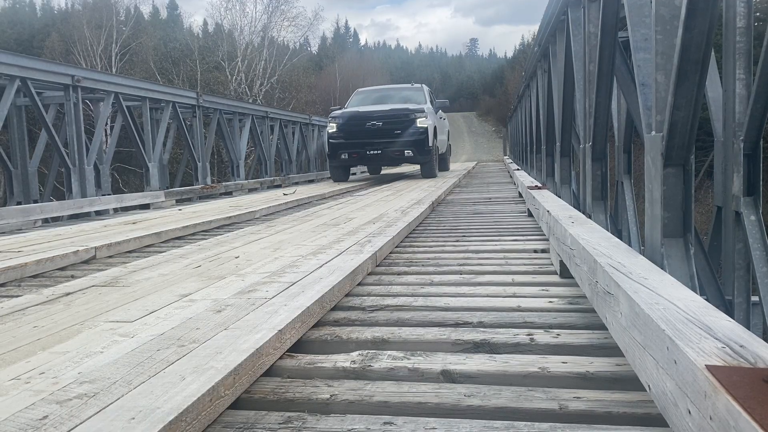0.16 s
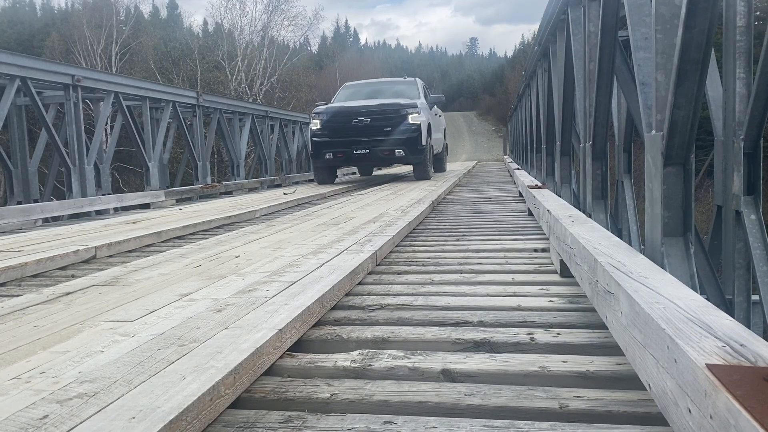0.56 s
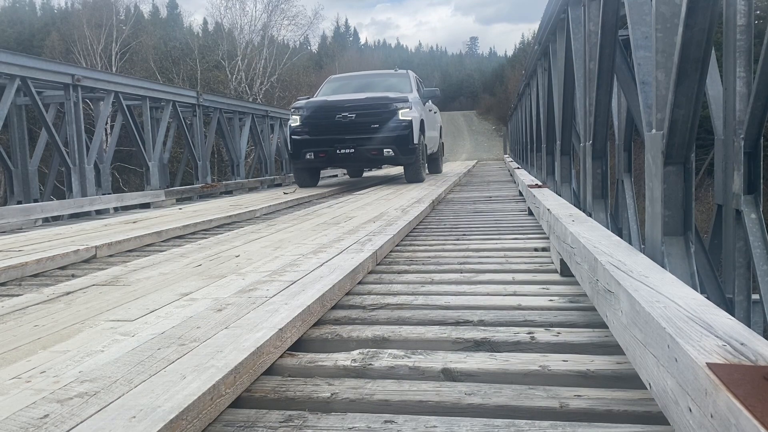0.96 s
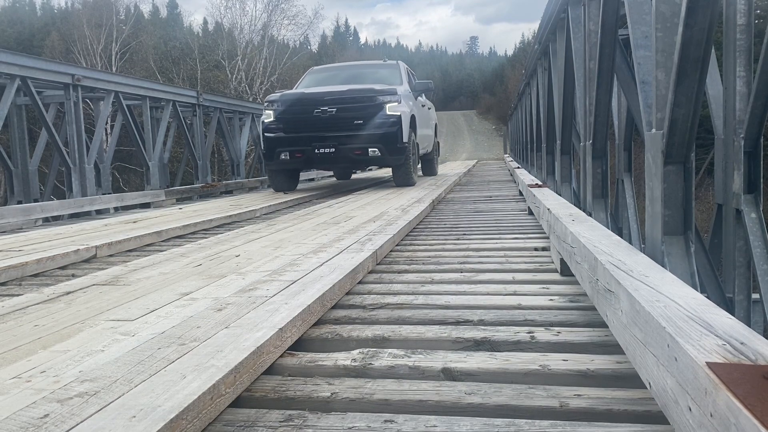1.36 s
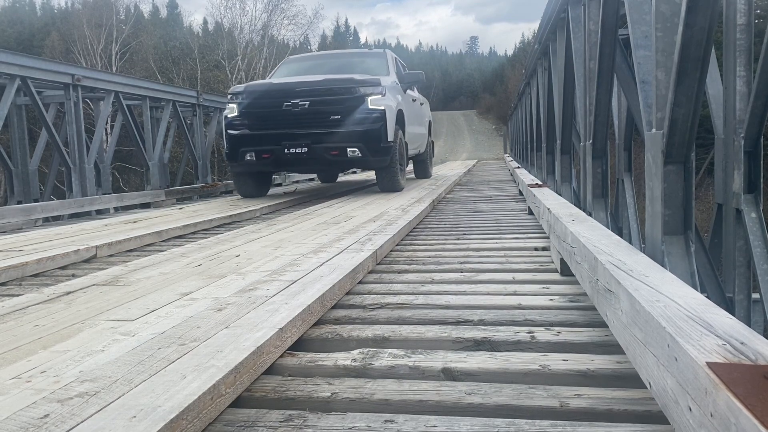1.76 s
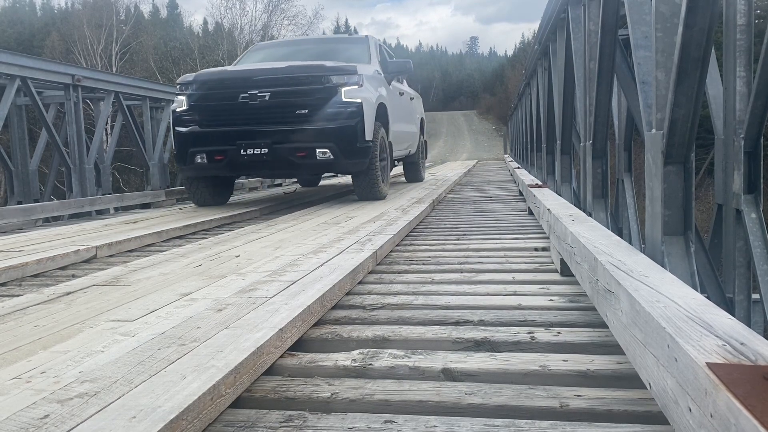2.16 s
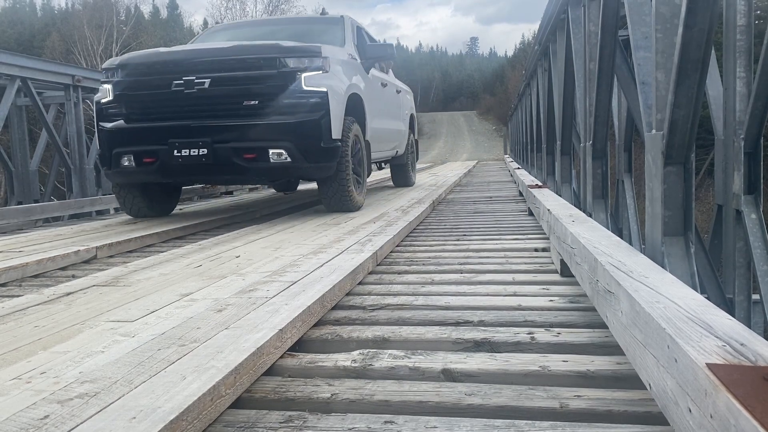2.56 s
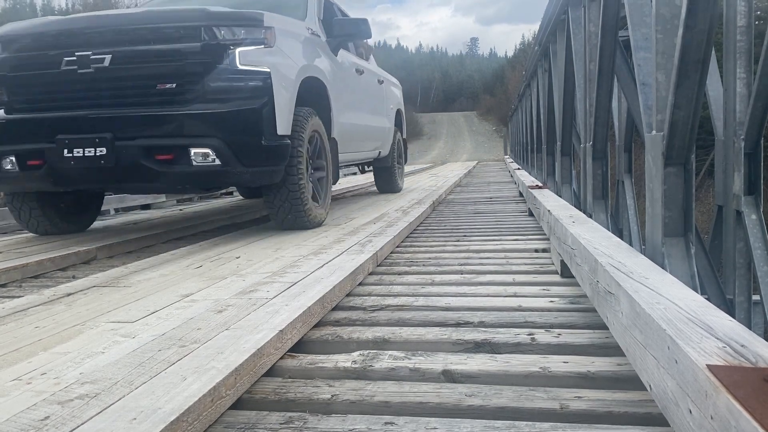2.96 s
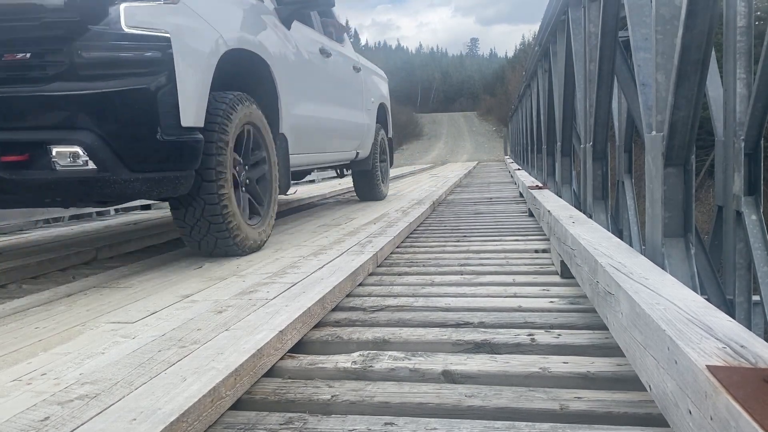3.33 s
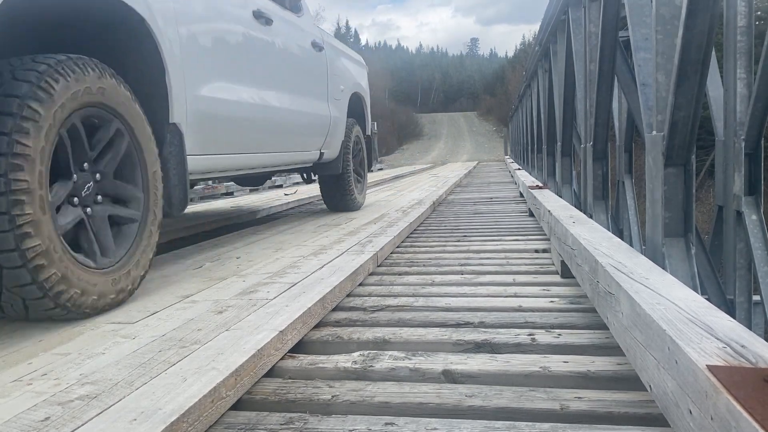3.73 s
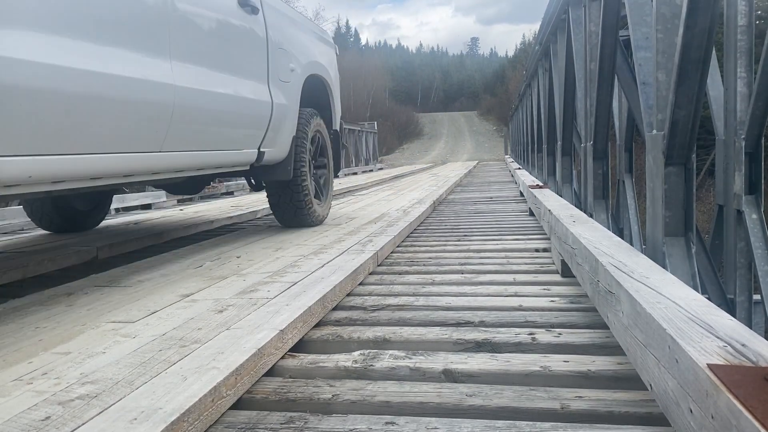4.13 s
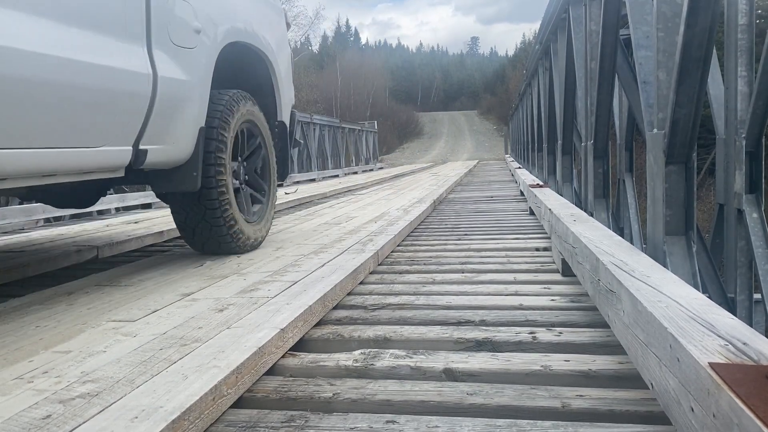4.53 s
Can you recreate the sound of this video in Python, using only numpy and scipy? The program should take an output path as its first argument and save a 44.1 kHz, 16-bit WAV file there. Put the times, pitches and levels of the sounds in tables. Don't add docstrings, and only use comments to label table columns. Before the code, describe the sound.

A pickup truck drives slowly towards a fixed stereo microphone on a steel-truss bridge with a wooden deck. At first it is quiet: low exhaust drone, soft tyre roll on wood and a faint rising whine. Around 0.7-0.9 s distant loose planks tap, one with a crisp knock, then a lull. From 1.55 s uneven slaps return, clearer at 1.9 and 2.1 s, clustered near 2.6 s, while the engine hum strengthens. A firm bang at 2.86 s leads to a heavy hollow slam at 3.12 s, then pairs near 3.4 and 3.6 s and a very hard one at 3.73 s. As the truck draws abreast, air hiss, tread noise and a steady mid-pitched driveline whine swell. More slams fall around 4.0 s, then a dense burst from 4.43 to 4.68 s. Each slap is a brief chatter, cracking clack and short woody thud, with a brief scattered tail.

```python
import sys
import numpy as np
from scipy import signal
from scipy.fft import rfft, irfft, next_fast_len
from scipy.io import wavfile

SR = 44100
rng = np.random.default_rng(int(sys.argv[2]) if len(sys.argv) > 2 else 0)


def linear_from_db(decibels):
    return 10 ** (np.asarray(decibels, float) / 20)


def log_audio(samples):
    frames = np.atleast_2d(samples).T
    limited = np.clip(frames, -1, 1)
    pcm = np.round(limited * 32767).astype(np.int16)
    wavfile.write(sys.argv[1], SR, pcm)


N = 206973

# time in seconds, pitch in Hz, level in dB.
EXHAUST_DRONE = [(0.0, 72.2, -51.5), (1.119, 75.36, -51.5), (1.16, 75.96, -40.5), (2.35, 76.1, -32.5),
                 (2.59, 76.1, -37.5), (3.03, 75.2, -33), (3.3, 76.2, -48), (3.8, 75.83, -47),
                 (4.27, 77.37, -30.5), (4.58, 79.1, -35.5), (4.69, 75, -26)]
# start in seconds, length in seconds, start pitch in Hz, end pitch in Hz, level in dB.
DRIVELINE_WHINES = [
    (-.2, 1.05, 968, 1003, -59.5),
    (1.1, .6, 1024, 1035, -62),
    (3.64, .52, 587, 584, -37),
    (4.22, .26, 588, 589, -34),
    (3.9, .36, 697, 702, -39.5),
]
# start in seconds, peak in dB, main mode in Hz.
PLANK_THUDS = [(0.75, -36.5, 438), (0.884, -25, 242), (0.915, -23, 408), (1.557, -28.5, 161),
               (1.58, -25, 199), (1.761, -26, 327), (1.79, -27, 440), (1.88, -18, 299), (2.126, -24, 196),
               (2.179, -31, 148), (2.214, -27.5, 446), (2.527, -20, 344), (2.593, -26, 192),
               (2.694, -23.5, 246), (2.858, -13.5, 254), (3.12, -5, 316), (3.386, -7.5, 293),
               (3.42, -12, 371), (3.59, -11, 229), (3.605, -13.5, 268), (3.733, -5.5, 256),
               (3.783, -18, 260), (3.926, -14, 344), (4.014, -8.5, 242.6), (4.098, -21, 151),
               (4.254, -23, 370), (4.435, -8, 206), (4.504, -12.5, 238), (4.535, -9, 184.4),
               (4.66, -11.5, 427)]
# multiple of the main mode, level in dB.
PLANK_MODES = [(0.621, -5.5), (1.004, 2), (1.43, -3), (2.1, -9.5)]
# frequency in Hz, level in dB per Hz.
RUMBLE_SPECTRUM = [(15, -46), (25, -32.5), (52, 2), (80, -3.5), (161, 0.5), (284, -7), (337, -7),
                   (450, -14), (580, -34), (990, -120)]
ROLL_SPECTRUM = [(210, -25), (350, 2.5), (410, 0), (661, 2), (909, -6), (1010, -6), (1600, -25),
                 (2080, -40), (3520, -120)]
HISS_SPECTRUM = [(1100, 2.5), (1500, 2.5), (2500, -2.5), (4500, -8), (7000, -13.5), (10000, -14),
                 (13000, -29), (15600, -4)]
SPLINTER_SPECTRUM = [(1000, -2), (1600, 5.5), (2500, -13.5), (4000, -5), (7000, -5), (11000, -12.5),
                     (16000, -21.5)]
TREAD_SPECTRUM = [(1700, -60), (2100, 1), (2800, 34), (3500, -18)]
# frequency in Hz, correlation from 0 to 1.
STEREO_LIKENESS = [(60, 1), (250, 1), (700, 0.86), (1400, 0.68), (3000, 0.55), (5200, 0.42), (6700, 0.83),
                   (16000, .995)]
# frequency in Hz, lag of the right in radians for sound from ahead,
# the same lag for sound from beside, left over right in dB for sound from beside.
MICROPHONE_PORTS = [(0, 0, 0, 0), (250, .05, .7, 1.5), (650, .15, 1.0, 7), (1150, .2, 1.3, 2),
                    (1550, .3, 3.4, 1), (2000, .5, 6.3, 3), (3300, .5, 6.9, 4), (4500, .2, 6.4, 2),
                    (6600, 0, 2 * np.pi, 0)]
# frequency in Hz, time to fall 60 dB in seconds.
TRUSS_DECAY = [(150, 0.44), (600, 0.38), (2500, 0.18), (9000, 0.12)]
# time in seconds, level in dB.
DECK_LEVEL = [(0.0, -45.5), (0.63, -46.5), (0.97, -40.5), (1.15, -44), (1.42, -44), (2.08, -38.5),
              (2.31, -41.5), (2.56, -44), (2.7, -36.5), (3.15, -38.5), (3.3, -33), (3.8, -34.5), (4.0, -33),
              (4.4, -31.5), (4.57, -26), (4.69, -30.5)]
# start in seconds, clack in dB, clack pitch in Hz, splinter in dB, chatter length in ms.
SLAPS_AHEAD = [(0.7248, -32, 1920, -61, 7.6), (0.8779, -8, 1370, -35.5, 2.17),
               (0.9095, -27, 2570, -47, 5.4), (1.138, -33, 2200, -49.5, 8.2),
               (1.5524, -38, 2700, -49.5, 4.7), (1.5815, -37, 2180, -50.5, 8.7),
               (1.6164, -32, 1790, -55, 4), (1.7586, -32, 2150, -49.5, 5.6), (1.879, -24, 1710, -39, 8.1),
               (2.1222, -24, 2260, -37, 7.4), (2.174, -27, 1870, -42.5, 15.4),
               (2.522, -36, 1803, -39.5, 11.5), (2.593, -26.5, 2100, -38, 20), (2.6125, -28, 2590, -39, 6),
               (2.6917, -32, 1750, -42.5, 7.1), (2.71, -36, 1730, -45, 4.3),
               (2.8589, -11.5, 2030, -30, 5.1)]
SLAPS_BESIDE = [(3.1192, -12.5, 3520, -21, 11.5), (3.3069, -39, 3800, -41, 10),
                (3.3792, -16, 2480, -29, 9.7), (3.4188, -15, 2340, -28.5, 11.4),
                (3.501, -47, 2400, -42, 10), (3.5756, -15.5, 3120, -34.5, 12),
                (3.5841, -15, 2326, -23.5, 5.8), (3.7308, -4, 2160, -26.5, 5.6),
                (3.779, -25, 2050, -54, 6.1), (3.927, -20.5, 2040, -48.5, 11),
                (4.0101, -22, 2026, -33.5, 6), (4.0944, -22, 2528, -39, 5.5), (4.2426, -43, 2420, -55, 7.1),
                (4.2902, -24, 1890, -40.5, 3.2), (4.436, -4, 3260, -21, 5.2), (4.4724, -23, 2350, -36.5, 5),
                (4.4997, -7.5, 2350, -24.5, 7.7), (4.532, -8.5, 2350, -24, 7.3),
                (4.5744, -16.5, 3900, -33, 5.1), (4.6501, -9, 2470, -29, 5.9),
                (4.678, -28, 3800, -41.5, 4.8)]
# start in seconds, peak in dB, lower mode in Hz.
WOOD_KNOCKS = [(0.726, -35, 507), (0.879, -14.5, 1040), (0.91, -25.5, 586), (1.555, -35.5, 587),
               (1.76, -27, 590), (1.88, -25, 593), (2.122, -26, 620), (2.173, -29, 563), (2.523, -30, 775),
               (2.595, -25.5, 527), (2.614, -29, 634), (2.693, -24, 497), (2.86, -20.5, 784),
               (3.119, -14.5, 767), (3.308, -37, 710), (3.38, -17.5, 573), (3.42, -14, 513),
               (3.508, -23.5, 560), (3.583, -12.5, 500), (3.732, -5, 768), (3.782, -16, 545),
               (3.928, -18, 580), (4.01, -9.5, 805), (4.096, -16, 533), (4.242, -40, 610),
               (4.292, -15, 616), (4.436, -5.5, 652), (4.498, -16, 700), (4.531, -11.5, 620),
               (4.651, -14, 920)]

SPEED_M_S, ABREAST_S, LANE_M = 2.4, 4.19, 1.95
REAR_AXLE_S, WHEEL_M = 4.87, 0.29
DECK_MEAN_DB = -39
BAY_S = 0.2


def rms_one(x):
    return x / np.sqrt(np.mean(x ** 2) + 1e-20)


def in_time(rows):
    seconds, *columns = np.transpose(rows)
    return [np.interp(np.arange(N) / SR, seconds, column) for column in columns]


def at_hz(points, hz):
    table_hz, values = np.array(points)[:, 0], np.array(points)[:, 1]
    return np.interp(np.log(hz), np.log(table_hz), values)


def drift(rate):
    r = np.exp(-80 * np.pi * rate / SR)
    slow = signal.lfilter([1], [1, -2 * r, r * r], rng.standard_normal(N // 40 + 2002))[2000:]
    return np.interp(np.arange(N) / 40, np.arange(len(slow)), rms_one(slow))


def ring(x, hz, t60):
    r, w = linear_from_db(-60 / (t60 * SR)), 2 * np.pi * hz / SR
    return signal.lfilter([0, np.sin(w)], [1, -2 * r * np.cos(w), r * r], x + 1e-18)


def highpass(x, hz):
    return signal.sosfilt(signal.butter(2, hz, "high", fs=SR, output="sos"), x)


def shaped(x, response):
    size = next_fast_len(N + 4096)
    hz = np.maximum(np.fft.rfftfreq(size, 1 / SR), 1)
    return irfft(rfft(x, size) * response(hz), size)[..., :N]


def unlikeness(hz):
    return np.sqrt(np.clip(1 - at_hz(STEREO_LIKENESS, hz), 0, 1))


def add(track, s, sound):
    i = round(s * SR)
    track[i:i + len(sound)] += sound[:N - i]


def per_bay(x, responses):
    step = round(BAY_S * SR)
    out = np.zeros((responses.shape[1], len(responses) * step + step + responses.shape[2]))
    for k, response in enumerate(responses):
        heard = signal.fftconvolve(x[None, k * step:(k + 1) * step], response, axes=1)
        out[:, k * step:k * step + heard.shape[1]] += heard
    return out[:, :N]


def distance(abreast_s, side_m):
    return np.hypot(SPEED_M_S * (np.arange(N) / SR - abreast_s), side_m)


def from_side():
    return np.clip(LANE_M / distance(ABREAST_S, LANE_M), 0, 1)


def banded_noise(spectrum, patchy_db, rate):
    out, together = 0, drift(rate)
    low_hz, high_hz = spectrum[0][0], spectrum[-1][0]
    edges = np.geomspace(low_hz, high_hz, round(3 * np.log2(high_hz / low_hz)) + 1)
    white = rng.standard_normal((2, 2, N))
    for k, (low, high) in enumerate(zip(edges, edges[1:])):
        band = signal.butter(2, [low, high], "band", fs=SR, output="sos")
        mid, side = signal.sosfilt(band, white[k % 2])
        centre = np.sqrt(low * high)
        alike = np.clip(at_hz(STEREO_LIKENESS, centre), -1, 1)
        flicker_db = patchy_db * (0.89 * together + drift(2 * rate))
        stereo = np.sqrt(1 + alike) * mid + np.sqrt(1 - alike) * side * [[1], [-1]]
        out = out + linear_from_db(at_hz(spectrum, centre) + flicker_db) * stereo
    return rms_one(out)


def tone(rows, wobble_db, waver):
    before = (rows[0][0] - 0.1, rows[0][1], -80)
    after = (rows[-1][0] + 0.1, rows[-1][1], -80)
    hz, level_db = in_time([before] + list(rows) + [after])
    level = np.sqrt(2) * linear_from_db(level_db + wobble_db * drift(16.5))
    cycles = np.cumsum(hz * (1 + waver * drift(20.8))) / SR
    return level * np.sin(2 * np.pi * cycles)


def deck_rumble(swing_db):
    return linear_from_db(-39 + 1.14 * swing_db) * banded_noise(RUMBLE_SPECTRUM, patchy_db=0.14, rate=2.4)


def tyre_roll(swing_db):
    return linear_from_db(-43 + swing_db) * banded_noise(ROLL_SPECTRUM, patchy_db=1.0, rate=20.5)


def tyre_tread(swing_db):
    truck = linear_from_db(-47 + 0.13 * swing_db) / distance(ABREAST_S, LANE_M)
    rear = linear_from_db(-48.5) / distance(REAR_AXLE_S, WHEEL_M)
    return np.hypot(truck, rear) * banded_noise(TREAD_SPECTRUM, patchy_db=1.2, rate=3.0)


def engine_hiss():
    level = linear_from_db(-35.5) / distance(ABREAST_S, LANE_M)
    hiss = level * banded_noise(HISS_SPECTRUM, patchy_db=1.0, rate=4.4)
    return signal.sosfilt(signal.ellip(8, 0.3, 40, 15800, fs=SR, output="sos"), hiss)


def whines():
    shape = [(0, -5), (0.25, 0), (0.75, 0), (1, -5)]   # (share of the length, dB)
    out = 0
    for s, length, hz, end_hz, level_db in DRIVELINE_WHINES:
        rows = [(s + u * length, hz + (end_hz - hz) * u, level_db + db) for u, db in shape]
        out = out + tone(rows, wobble_db=2.0, waver=0.0041)
    return out


def exhaust():
    s, hz, level_db = np.transpose(EXHAUST_DRONE)
    orders = [(1, 0.0), (2, -19.5)]   # (multiple, dB)
    return sum(tone(list(zip(s, k * hz, level_db + db)), wobble_db=-1.0, waver=0.00087) for k, db in orders)


def thuds():
    out, t = np.zeros(N), np.arange(8192) / SR
    push = signal.lfilter([1, -1], 1, t * np.exp(-t / 0.00115))
    chance = rng.standard_normal((len(PLANK_THUDS), len(PLANK_MODES), len(t)))
    for (s, peak_db, hz), grits in zip(PLANK_THUDS, chance):
        t60 = 0.054 * (250 / hz) ** 0.13 * linear_from_db(-0.04 * (peak_db - 3))
        modes = 0
        for (k, db), grit in zip(PLANK_MODES, grits):
            uneven_push = push * (grit[0] + 1.63 * grit)
            modes = modes + linear_from_db(db) * rms_one(ring(uneven_push, k * hz, t60))
        add(out, s, linear_from_db(peak_db) * modes / np.abs(modes).max())
    return highpass(out, 100)


def chatter(white, size, length_ms, rise_ms):
    t_ms = 1000 * np.arange(len(white)) / SR
    envelope = np.minimum(t_ms / max(rise_ms, 0.1), 1) * np.exp(-t_ms / max(length_ms, 0.5))
    burst = envelope * white * linear_from_db(4.8 * size)
    snap = 25 / max(length_ms, 0.5) * np.exp(-((t_ms - rise_ms) / 0.017) ** 2)
    return burst + snap


def knocks():
    out, slap = np.zeros(N), np.array(SLAPS_AHEAD + SLAPS_BESIDE)
    chance = rng.standard_normal((len(WOOD_KNOCKS), 3, 4096))
    for (s, peak_db, hz), (a, b, size) in zip(WOOD_KNOCKS, chance):
        length_ms = slap[np.abs(slap[:, 0] - s).argmin(), -1]
        low = chatter(a, size, length_ms, rise_ms=2.536)
        high = chatter(b, size, length_ms, rise_ms=0.37)
        upper_hz = 1004 * (1 + 0.091 * b[0])
        knock = rms_one(ring(low, hz, 0.019))
        knock = knock + 0.41 * rms_one(ring(high, upper_hz, 0.026))
        knock = knock + 0.51 * rms_one(ring(high, 1.5 * hz, 0.002))
        add(out, s, linear_from_db(peak_db) * knock / np.abs(knock).max())
    return out


def cracks():
    clacks, splinters = np.zeros((2, N))
    rows = SLAPS_AHEAD + SLAPS_BESIDE
    chance = rng.standard_normal((len(rows), 2, 4096))
    for (s, clack_db, hz, splinter_db, length_ms), (white, size) in zip(rows, chance):
        rise_ms = 0.828 + 0.0812 * length_ms
        contacts = chatter(white, size, length_ms, rise_ms)
        broad_db = 4 + 0.64 * (splinter_db - clack_db + 19.5)
        clack = rms_one(ring(contacts, hz, 0.01)) + linear_from_db(broad_db) * rms_one(ring(contacts, 3080, 0.00072))
        add(clacks, s, linear_from_db(clack_db - 0.5) * clack / np.abs(clack).max())
        add(splinters, s, linear_from_db(splinter_db + 9) * contacts / np.sqrt(np.mean(contacts[:400] ** 2)))
    both = clacks + shaped(splinters, lambda hz: linear_from_db(at_hz(SPLINTER_SPECTRUM, hz)))
    return highpass(both, 900)


def spread(x):
    white = rng.standard_normal((int(N / SR / BAY_S) + 1, 1, 400))
    smears = rms_one(white * np.exp(-np.arange(400) / 90)) / np.sqrt(400)
    return x + 0.68 * shaped(per_bay(x, smears)[0], unlikeness) * [[1], [-1]]


def trusses(x):
    t, tails = np.arange(SR // 3) / SR, 0
    white = rng.standard_normal((int(N / SR / BAY_S) + 1, 2, len(t)))
    for low in 110 * 2.0 ** np.arange(7):
        octave = signal.butter(2, [low, 2 * low], "band", fs=SR, output="sos")
        decay = linear_from_db(-60 * t / at_hz(TRUSS_DECAY, 1.4 * low))
        tails = tails + signal.sosfilt(octave, white) * decay
    mid, side = per_bay(x, tails * np.minimum(t / 0.0036, 1))
    return mid + shaped(side, unlikeness) * [[1], [-1]]


def loose_planks():
    planks = knocks() + cracks() + thuds()
    return spread(planks) + trusses(linear_from_db(-25 - 9.4 * from_side()) * planks)


def scene():
    swing_db = in_time(DECK_LEVEL)[0] - DECK_MEAN_DB
    rolling = deck_rumble(swing_db) + tyre_roll(swing_db) + tyre_tread(swing_db)
    return rolling + engine_hiss() + whines() + exhaust() + loose_planks()


def roll_off(x):
    return signal.sosfilt(signal.butter(12, 16640, fs=SR, output="sos"), x)


def record(dry):
    table = np.array(MICROPHONE_PORTS)
    port = lambda hz, column: np.interp(hz, table[:, 0], table[:, column])
    right, tilt = np.array([[0], [1]]), np.array([[0.5], [-0.5]])
    path = lambda hz: 2 * np.pi / 4350 * np.maximum(hz - 6750, 0)
    turn = lambda hz, column: np.exp(1j * right * (path(hz) - port(hz, column)))
    dry = highpass(dry, 48)
    ahead = shaped(dry, lambda hz: turn(hz, 1))
    beside = shaped(dry, lambda hz: turn(hz, 2) * linear_from_db(tilt * port(hz, 3)))
    share = from_side()
    ports = 1.407 * np.tanh(((1 - share) * ahead + share * beside) / 1.213)
    ports = signal.sosfilt(signal.ellip(8, 0.3, 60, 16400, fs=SR, output="sos"), ports)
    return roll_off(ports)


dry = scene()
out = record(dry)
log_audio(out)
```